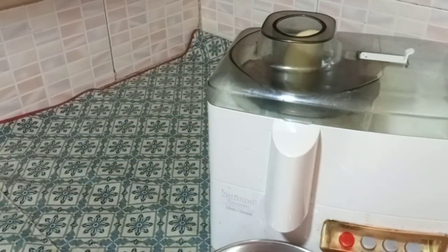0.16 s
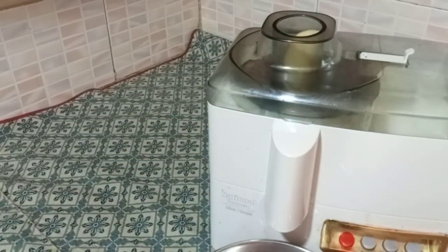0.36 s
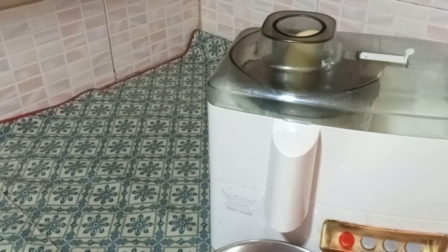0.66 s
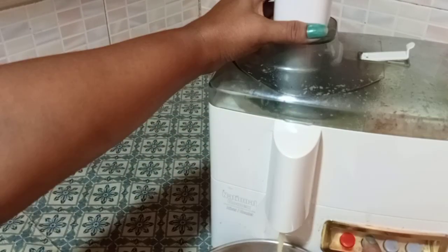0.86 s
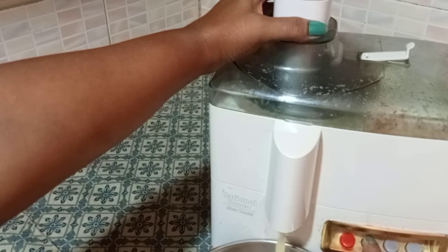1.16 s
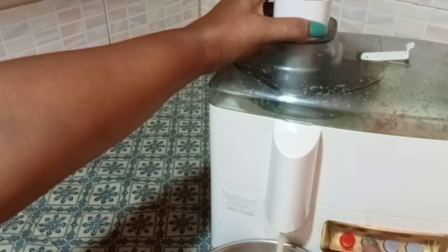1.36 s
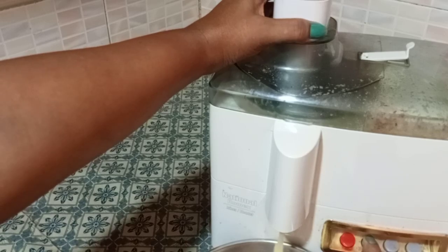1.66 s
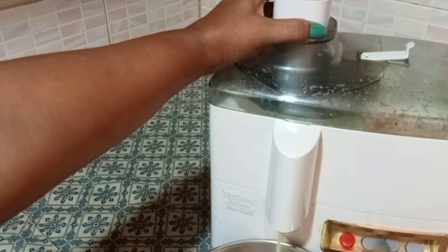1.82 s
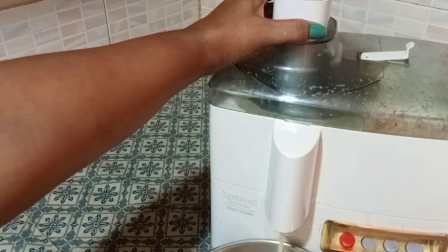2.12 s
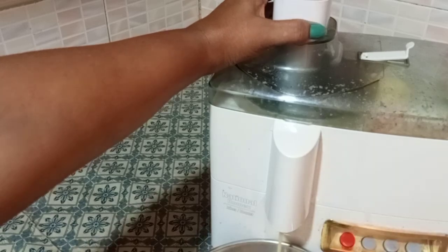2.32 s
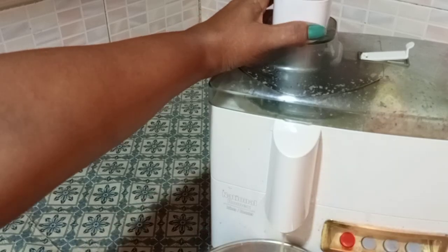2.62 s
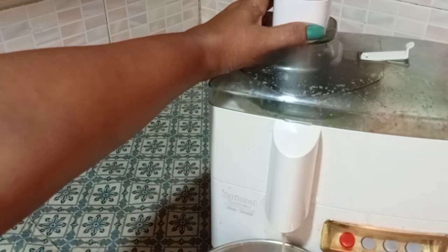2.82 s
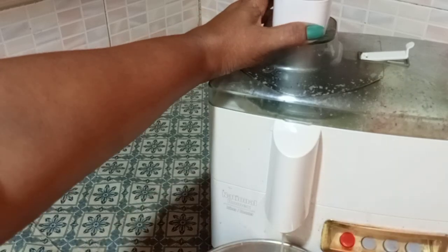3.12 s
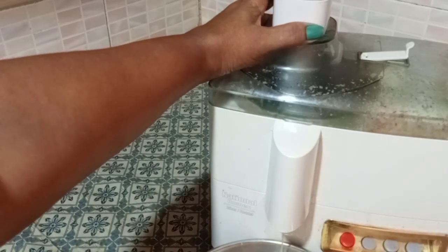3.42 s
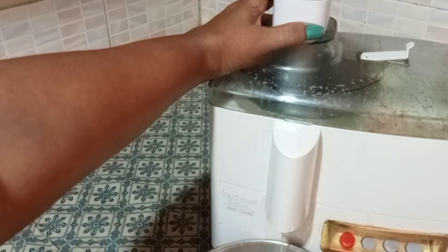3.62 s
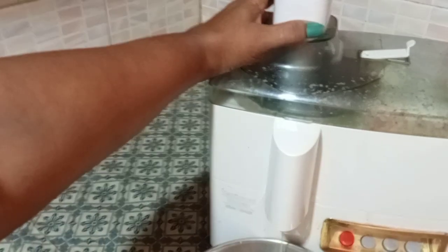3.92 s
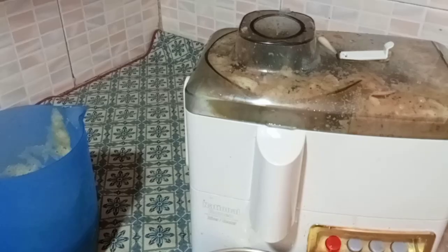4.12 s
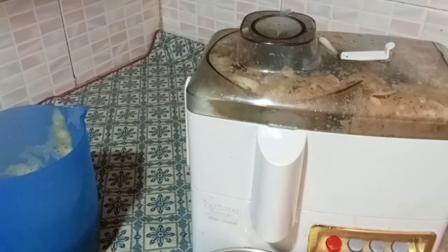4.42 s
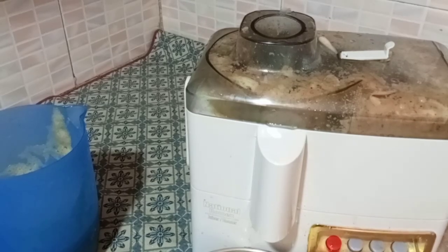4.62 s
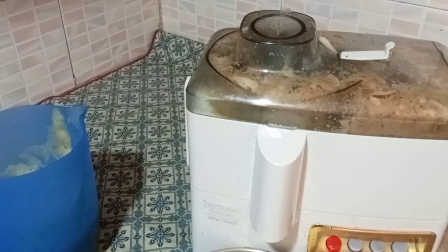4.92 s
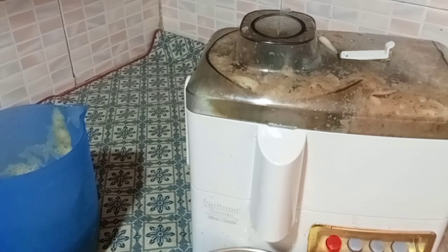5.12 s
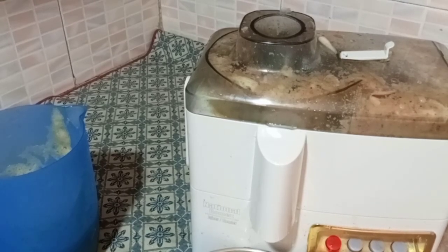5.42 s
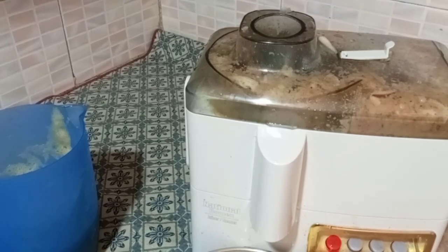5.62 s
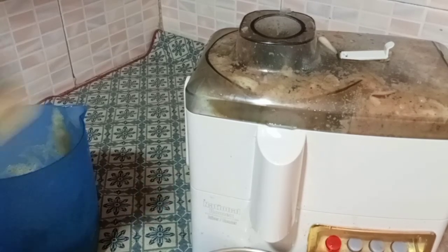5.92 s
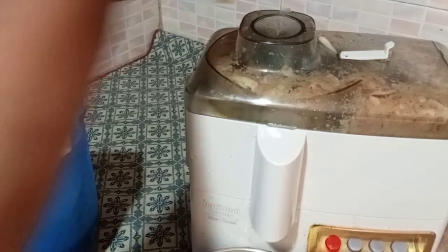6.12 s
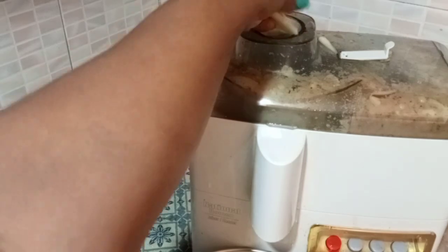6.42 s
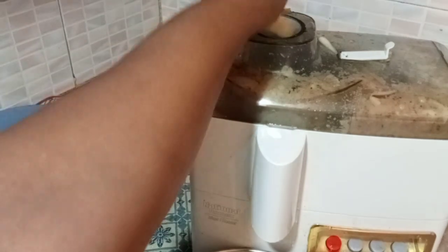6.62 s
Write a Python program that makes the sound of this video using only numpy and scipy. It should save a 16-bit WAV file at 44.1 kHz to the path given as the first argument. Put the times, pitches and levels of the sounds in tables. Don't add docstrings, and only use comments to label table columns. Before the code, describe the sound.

Recorded near the appliance in a home kitchen with faint hiss: steady low buzzing drone first, a tiny gap, then the juicer bites with a hard crunch. The motor speeds up and beats unevenly, fruit jams and grinds in surges, strongest around two and a half seconds, bits clicking on the cover. A hard cut leaves only the drone, with thin distant squeaks and finally a dull plastic clunk.

```python
import sys
import numpy as np
from scipy import signal
from scipy.fft import rfft, irfft
from scipy.io import wavfile
from scipy.ndimage import uniform_filter1d

SR = 44100
rng = np.random.default_rng(int(sys.argv[2]) if len(sys.argv) > 2 else 0)


def generate_wav(signal):
    frames = np.transpose(np.atleast_2d(signal))
    scaled = np.clip(frames, -1, 1) * 32767
    pcm = np.round(scaled).astype(np.int16)
    wavfile.write(sys.argv[1], SR, pcm)


def nominal_scale(level):
    x = np.asarray(level, float) / 20
    return 10 ** x


N = 298116
T = np.arange(N) / SR
SUPPLY_HZ = 48.4


def motor():
    beat_orders = [(1, -1), (1, 1), (1, 2), (2, -2), (2, -1), (2, 0), (2, 1), (3, 0), (3, 1), (4, 0)]
    beat_levels = [-17, -11.5, -15, -16, -19.5, -13.5, -15, -21, -23.5, -19.5]
    # frequency in Hz, width in Hz, lift in dB.
    housing = [(208, 15, 3.5), (236, 7.4, -4), (386.4, 11.8, 5), (489.5, 12, -0.5)]
    # frequency in Hz, level in dB.
    growl_tones = [(99.6, -6), (199.2, 1), (247.6, -8)]
    # frequency in Hz, level in dB per Hz.
    rumble_spectrum = [(18, -50), (30, -12), (50, -19), (75, -15), (214, -4.5), (305, -7), (372, -4),
                       (478, -8.5), (606, -15.5), (700, -17), (910, -99), (1540, -120)]

    shaft = shaft_hz()
    beats = np.zeros(N)
    for (k, m), db in zip(beat_orders, beat_levels):
        hz = k * shaft + m * SUPPLY_HZ
        lift = 1 + sum(nominal_scale(d) / (1 + ((hz - f) / w) ** 2) for f, w, d in housing)
        lift *= (shaft / 150) ** 3 / (1 + (84 / hz) ** 10)
        lift *= np.prod([1 - np.exp(-((hz - f) / 9) ** 2) for f, _ in growl_tones], axis=0)
        angle = phase_of(hz) + .15 * k * wander(8) + 2 * np.pi * rng.random()
        beats += nominal_scale(db + 1.8 * wander(8.5)) * lift * np.sin(angle)

    unbalance_db = load_db((-27.5, -22), index=0, share_db=-8.5) + wander(27)
    unbalance = nominal_scale(unbalance_db) * np.sin(phase_of(shaft))

    rumble = coloured(rng.standard_normal(N) * nominal_scale(1.07 * wander(40.0)), rumble_spectrum)
    rumble += nominal_scale(-5.0) * evened(resonate(rumble, 207.6, 16))
    rumble += nominal_scale(-7.5) * evened(resonate(rumble, 105.4, 4.3))

    shake = nominal_scale(load_db((-23.5, -22.5), index=0))
    growl = sum(nominal_scale(db) * np.sin(2 * np.pi * hz * T) for hz, db in growl_tones)
    growl = nominal_scale(load_db((-60, -60), index=0)) * (shaft / 150) ** 4 * growl
    return unbalance + shake * (nominal_scale(1.1) * beats + nominal_scale(-10) * rumble) + growl


def shaft_hz():
    sag = 3.2 * np.exp(-.5 * ((T - 2.55) / .33) ** 2)
    return climb((101.2, 174)) - sag


def load_db(ends_db, index, share_db=0):
    # peak in seconds, rise in seconds, fall in seconds,
    # shaking in dB, grinding in dB.
    jams = [(0.911, 0.011, 0.033, -10, -20), (.99, 0.028, 0.031, -14.5, -31.5),
            (1.1, 0.031, 0.05, -20.5, -39), (1.24, 0.032, .02, -21.5, -40), (1.36, 0.039, 0.063, -23, -47),
            (1.57, 0.023, 0.028, -24.5, -32.5), (1.75, .03, 0.045, -21, -32.5),
            (1.9, 0.021, 0.051, -23.5, -30), (2.12, 0.038, 0.088, -13.5, -27),
            (2.46, 0.081, 0.096, -14.5, -26.5), (2.476, 0.033, 0.019, -19, -16.5),
            (2.586, 0.053, 0.025, -19.5, -19.5), (2.81, 0.016, 0.031, -22, -23.5),
            (2.96, 0.014, 0.033, -23, -44), (3.25, 0.06, 0.032, -25.5, -42), (3.9, 0.15, 0.18, -34, -31.5)]
    clear_s, clear_db, refill_s = 2.9, -4, 0.064
    light_db = clear_db * (T > clear_s) * np.exp(-np.maximum(T - clear_s, 0) / refill_s)
    power = nominal_scale(climb(ends_db) + light_db) ** 2
    for s, rise, fall, *db in jams:
        swell = np.exp(-((T - s) / np.where(T < s, rise, fall)) ** 2)
        power = power + nominal_scale(db[index] + share_db) ** 2 * swell
    return 10 * np.log10(power)


def grater():
    # frequency in Hz, level in dB per Hz.
    tearing = [(260, -12.5), (450, -3), (615, -14.5), (673, -2.5), (761, -3.5), (1040, -6), (1290, -4),
               (1530, -9), (3200, -18), (4160, -59), (7040, -120)]
    # frequency in Hz, width in Hz, level in dB.
    bowl_modes = [(730, 270, -10), (1025, 370, 3.5), (1240, 46, -2.5), (2260, 480, -4), (2760, 610, -7.5),
                  (3290, 580, -6.5)]

    level_db = load_db((-45.5, -29.5), index=1)
    per_turn = 1 + 0.094 * np.cos(phase_of(shaft_hz()))
    bites = rng.standard_normal(N) * per_turn * nominal_scale(0.78 * wander(56))
    bowl = np.zeros(N)
    for hz, width, db in bowl_modes:
        ring = resonate(resonate(bites, hz, width), hz, width)
        bowl += nominal_scale(db) * evened(ring)
    jam = np.clip((level_db + 30.5) / 9, 0, 1)
    torn = patchy(coloured(bites, tearing), depth_db=1.5)
    return nominal_scale(level_db) * ((1 - 0.16 * jam) * torn + 0.56 * jam * evened(bowl))


def spray():
    # frequency in Hz, level in dB per Hz.
    spray_spectrum = [(1180, 0.5), (2000, -5), (2240, -11), (2400, -11), (3310, -3), (4050, -9.5),
                      (5160, -21.5), (7510, -4), (9660, -22.5), (11800, -24), (14900, -16), (15600, -15),
                      (16000, -37)]

    present = rng.random(N) < 2500 / SR
    drops = nominal_scale(4.6 * np.minimum(rng.exponential(1, N), 5)) * present * rng.standard_normal(N)
    air = (rng.standard_normal(N) + .5 * evened(drops)) * nominal_scale(0.25 * wander(49))
    singing = np.interp(T, [1.35, 1.52, 1.8, 1.9, 2.25, 2.8], [.3, 1, 1, .3, .45, .2])
    sing = evened(resonate(air, 3233, 28)) * nominal_scale(-9.5 + 3 * wander(13)) * singing
    level = nominal_scale(load_db((-37, -31), index=1, share_db=-14))
    return level * (patchy(coloured(air, spray_spectrum), depth_db=2.1) + sing)


def brushes():
    # multiple of the shaft, multiple of the supply, start in seconds, end in seconds.
    whines = [(24, 0, .93, 1.12), (24, 0, 1.3, 1.65), (24, 0, 1.75, 2.3), (73, 0, 1.85, 2.4),
              (60, 1, 2.75, 3.1), (60, 2, 3.25, 4.2)]
    whine_levels = [-41, -48, -47, -62, -64, -62]

    out = np.zeros(N)
    shaft = shaft_hz()
    throb = nominal_scale(2.5 * wander(8))
    for (k, m, start, end), db in zip(whines, whine_levels):
        hz = k * shaft[round(start * SR):round(end * SR)] + m * SUPPLY_HZ
        fade = signal.windows.hann(len(hz)) ** .25
        add(out, start, nominal_scale(db) * fade * whistle(hz, 1.2 * k, clean=.6))
    return out * throb


def ticks():
    # start in seconds, peak in dB, ring in Hz, 60 dB decay in seconds.
    bits = [(0.9544, -23.5, 3200, 0.22), (0.9832, -22.5, 2590, 0.072), (1.049, -31.5, 2530, 0.12),
            (1.0898, -25, 2980, 0.08), (1.1473, -30.5, 2960, 0.25), (1.1911, -11, 2800, 0.083),
            (1.354, -31, 3230, 0.064), (1.511, -22, 4020, 0.055), (1.6802, -29, 3240, 0.052),
            (1.6987, -23, 3000, 0.067), (1.785, -31, 7400, 0.07), (1.8908, -23.5, 3330, 0.07),
            (1.9125, -23.5, 2820, 0.051), (2.0068, -26, 7500, 0.065), (2.209, -27, 3230, 0.07),
            (2.2727, -25, 3900, 0.082), (2.2996, -26, 3580, 0.041), (2.345, -27.5, 7650, 0.53),
            (2.389, -20, 7400, 0.16), (2.418, -24, 2480, 0.1), (2.4694, -30, 1050, 0.037),
            (2.4868, -18.5, 2850, 0.057), (2.585, -36, 1000, 0.074), (2.665, -14.5, 3500, 0.068),
            (2.7881, -26, 2230, 0.1), (2.8094, -20, 2260, 0.053), (3.048, -23.5, 7800, 0.14),
            (3.556, -21, 7250, 0.058), (6.5032, -35.5, 3600, 0.053)]
    # start in seconds, peak in dB, ring in Hz, 60 dB decay in seconds,
    # rise in seconds, thud in dB.
    crunch = (0.894, -5, 3880, .11, 0.015, 3)
    # frequency in Hz, level in dB per Hz.
    cover = [(710, -63), (1200, -47), (1680, -10), (3050, -0.5), (3910, -4.5), (5070, -30), (7020, -3.5),
             (9930, -22), (14800, -29), (16000, -30)]
    # start in seconds, level in dB, then modes, each of frequency in Hz,
    # level in dB, 60 dB decay in seconds.
    chute_drop = (6.511, -9.5, [(330, -6, .09), (253, -14, .12), (673, -22, .1), (1075, 0, .06),
                  (1085, -17, .2), (3225, -33, .1), (3420, -31, .08), (3750, -30, .05)])

    out = np.zeros(N)
    t = np.arange(8192) / SR
    hits = [crunch] + [row + (0.0013, -10) for row in bits]
    for (s, db, hz, t60, rise, thud_db), noise in zip(hits, rng.standard_normal((len(hits), 8192))):
        crack = coloured(noise, cover) + 0.66 * evened(resonate(noise, hz, 370))
        thud = np.sin(2 * np.pi * 210 * t) + 0.8 * np.sin(2 * np.pi * 510 * t)
        shape = nominal_scale(-60 * t / max(t60, .01)) * np.minimum(t / max(rise, .0003), 1) ** 2
        add(out, s, nominal_scale(db - 6) * shape * (crack + nominal_scale(thud_db) * thud))

    s, db, modes = chute_drop
    ring = sum(nominal_scale(db + d - 60 * t / t60) * np.sin(2 * np.pi * f * t) for f, d, t60 in modes)
    add(out, s, ring * np.minimum(t / .009, 1))
    return out


def drone():
    # multiple of the drone frequency, level in dB.
    low_orders = [(1, -22), (2, 2.5), (3, -58), (4, -7), (5, -8), (6, 3.5), (7, 0), (8, -21), (9, -10),
                  (10, -24), (11, -2), (12, -3), (13, -18), (14, -7), (15, -15), (16, -16.5), (17, -20),
                  (18, -17.5), (19, -28), (20, -21), (21, -18.5), (22, -15), (23, -24), (24, -32),
                  (25, -29), (26, -32.5), (27, -12), (28, -10), (29, -21), (30, -17)]
    # frequency in Hz, level in dB.
    high_orders = [(1200, -19.5), (1400, -25), (1700, -30), (2050, -25.5), (2300, -31.5), (2800, -30),
                   (4200, -42), (5000, -63.5)]
    # frequency in Hz, width in Hz, change in dB.
    panels = [(1335, 50, 6), (1435, 20, -7), (1515, 30, 9), (1600, 35, 8), (1935, 20, 6), (1975, 15, -7),
              (2035, 35, 4), (2290, 30, 7)]
    # frequency in Hz, level in dB per Hz.
    roar_spectrum = [(24, -35.5), (40, 0), (80, -9), (126, -12), (240, -10), (376, -7.5), (437, -5.5),
                     (640, -18), (970, -15), (1070, -17.5), (1720, -26), (2830, -25), (4900, -48),
                     (7480, -35), (15400, -82)]
    drone_hz, panel_lag_s = 38.72, .0055

    k = np.arange(1, 129)
    hz = k * drone_hz
    level_db = read(high_orders, hz) + np.clip(2.5 * rng.standard_normal(len(k)), -6, 3)
    level_db += sum(db * np.exp(-((hz - f) / width) ** 2) for f, width, db in panels)
    level_db[:len(low_orders)] = np.transpose(low_orders)[1]

    in_step = (k < 15) | (abs(hz - 1065) < 70)
    lead = np.arctan2(10, hz - 230) * (k > 4)
    phase = -2.6 + lead + np.where(in_step, .15, 1.5) * rng.standard_normal(len(k))
    phase -= 2 * np.pi * hz * panel_lag_s * (k > 20)
    cycle = irfft(np.r_[0, nominal_scale(level_db) * np.exp(1j * phase)], 4096)

    turns = np.cumsum(drone_hz * (1 + 0.00058 * wander(2.2))) / SR
    blows = np.interp(turns % 1, np.arange(4097) / 4096, np.r_[cycle, cycle[0]])
    blows = evened(blows) * nominal_scale(0.35 * wander(20))
    puff = 1 + 0.083 * np.cos(2 * np.pi * turns)
    roar = coloured(rng.standard_normal(N) * puff * nominal_scale(0.2 * wander(9.9)), roar_spectrum)
    shade_db = np.interp(T, (6.2, 5.92), [0, -0.74])
    return nominal_scale(-28.5 + shade_db) * blows + nominal_scale(-39) * roar


def squeaks():
    # start in seconds, length in seconds, first and last frequency in Hz, level in dB.
    far_squeaks = [(4.22, .25, 1930, 1960, -54), (5.82, .24, 1840, 2000, -50.5),
                   (5.96, .29, 2260, 2290, -49), (5.98, .22, 2010, 2030, -51), (6.0, .12, 2170, 2200, -50),
                   (5.085, .05, 2150, 2220, -51)]
    out = np.zeros(N)
    for s, length, from_hz, to_hz, db in far_squeaks:
        size = round(length * SR)
        tone = whistle(np.linspace(from_hz, to_hz, size), 55, clean=.5)
        add(out, s, nominal_scale(db) * tone * signal.windows.hann(size) ** .3)
    return out


def hiss():
    # frequency in Hz, level in dB per Hz.
    hiss_spectrum = [(5290, -29), (9000, -16), (10900, 5), (13000, 4), (14900, 10), (15600, -1)]
    return nominal_scale(-72) * coloured(rng.standard_normal(N), hiss_spectrum)


def whistle(hz, width, clean):
    noise = rng.standard_normal((2, len(hz)))
    waver = .35 * width * evened(uniform_filter1d(noise[1], size=700))
    line = np.sqrt(2) * np.sin(phase_of(hz + waver))
    return clean * line + np.sqrt(1 - clean ** 2) * evened(resonate(noise[0], hz, width))


def patchy(x, depth_db):
    z = signal.stft(x, nperseg=512)[2]
    field = uniform_filter1d(rng.standard_normal(z.shape), size=4, axis=0)
    field = uniform_filter1d(field, size=8, axis=1)
    return evened(signal.istft(z * nominal_scale(depth_db * evened(field)), nperseg=512)[1][:N])


def resonate(x, hz, width):
    turn = np.exp(1j * phase_of(hz * np.ones(len(x))))
    r = np.exp(-np.pi * width / SR)
    return 2 * (turn * signal.lfilter([1 - r], [1, -r], x / turn)).real


def coloured(x, points):
    hz = np.fft.rfftfreq(len(x), 1 / SR)
    return evened(irfft(rfft(x) * nominal_scale(read(points, hz)), len(x)))


def wander(rate_hz):
    lowpass = signal.butter(2, rate_hz, fs=SR / 64, output="sos")
    slow = signal.sosfiltfilt(lowpass, rng.standard_normal(N // 64 + 2))
    return np.interp(T * SR / 64, np.arange(len(slow)), evened(slow))


def climb(ends):
    start_s, run_up_s = .89, 1.32
    return ends[0] + (ends[1] - ends[0]) * (1 - np.exp(-np.maximum(T - start_s, 0) / run_up_s))


def phase_of(hz):
    return 2 * np.pi * np.cumsum(hz) / SR


def read(points, hz):
    f, value = np.transpose(points)
    return np.interp(np.log(hz + 1), np.log(f + 1), value)


def evened(x):
    return x / np.sqrt(np.mean(x ** 2) + 1e-20)


def add(mix, s, sound):
    part = mix[round(s * SR):][:len(sound)]
    part += sound[:len(part)]


def scene():
    # start in seconds, end in seconds.
    shots = [
        (0, .8228),
        (.8883, .8915),
        (.8935, 4.045),
        (4.045, 6.76),
    ]
    on = [(T >= a) & (T < b) for a, b in shots]
    running = uniform_filter1d(1. * (on[1] | on[2]), size=40)
    sliver = nominal_scale(11 * on[1])
    juicer = motor() + grater() + spray() + brushes()
    mix = running * sliver * juicer + ticks() + drone() + squeaks() + hiss()
    return (mix * uniform_filter1d(1. * sum(on), size=30))[None]


def top_cut(x):
    return signal.sosfilt(signal.butter(12, 16610, fs=SR, output="sos"), x)


def record(dry):
    x = signal.sosfilt(signal.butter(6, 64, "highpass", fs=SR, output="sos"), dry)
    x = 1.2 * np.tanh(x / 1.2)
    x = signal.oaconvolve(x, signal.firwin(401, 15700, fs=SR)[None], "same")
    return top_cut(x)


dry = scene()
out = record(dry)
generate_wav(out)
```